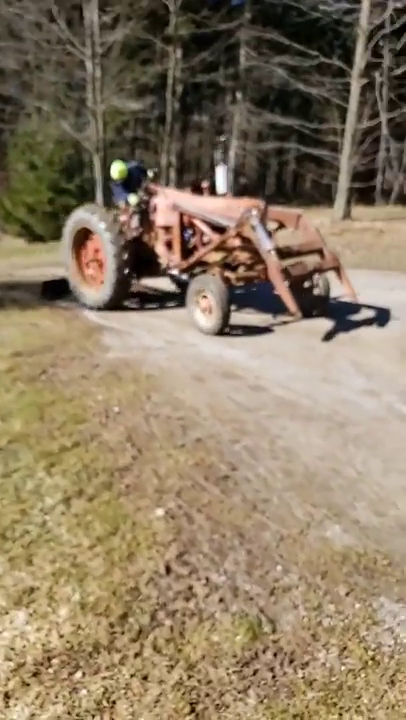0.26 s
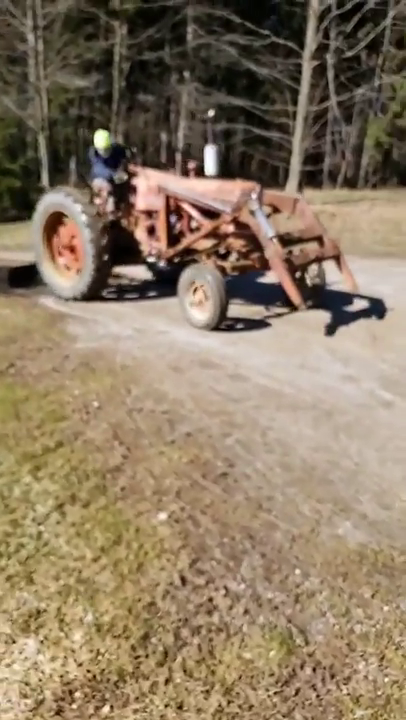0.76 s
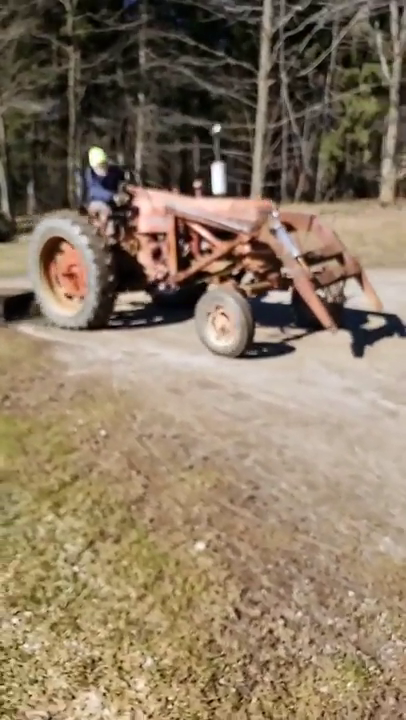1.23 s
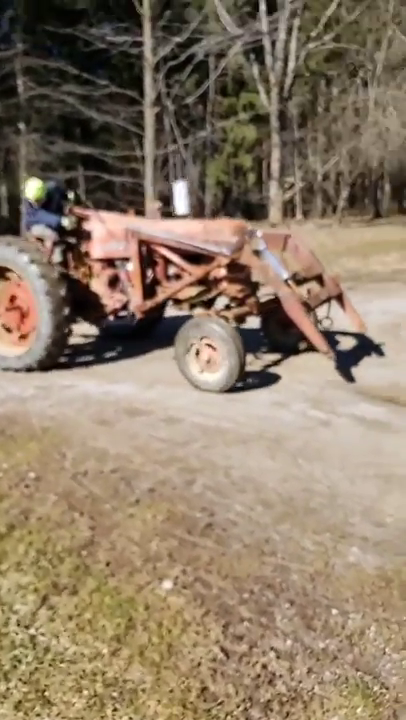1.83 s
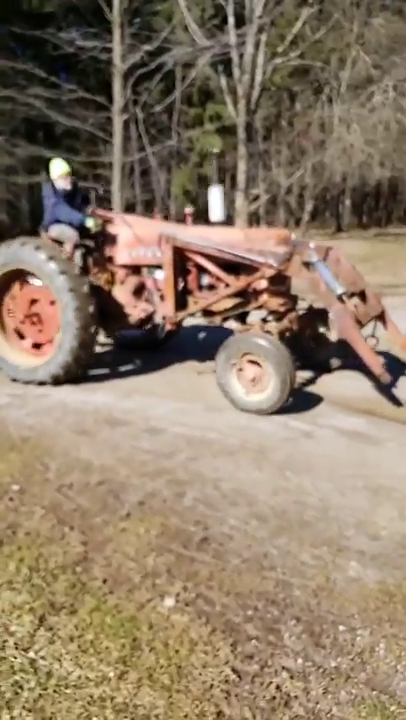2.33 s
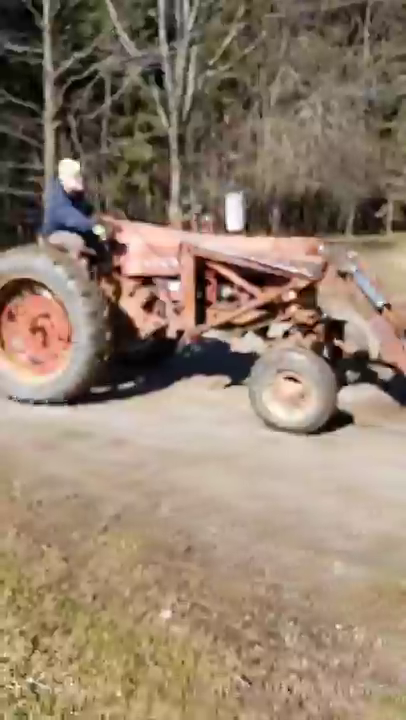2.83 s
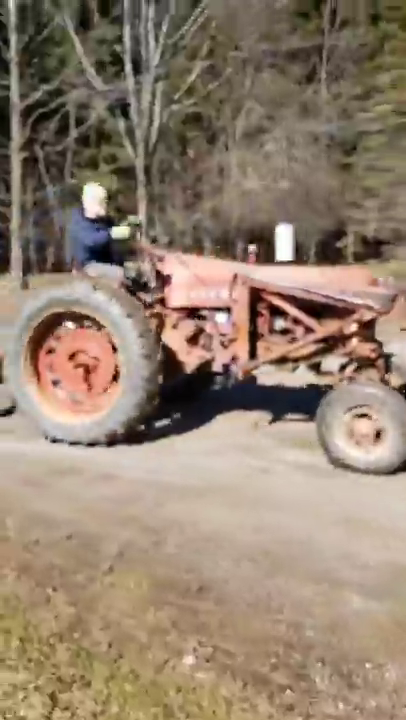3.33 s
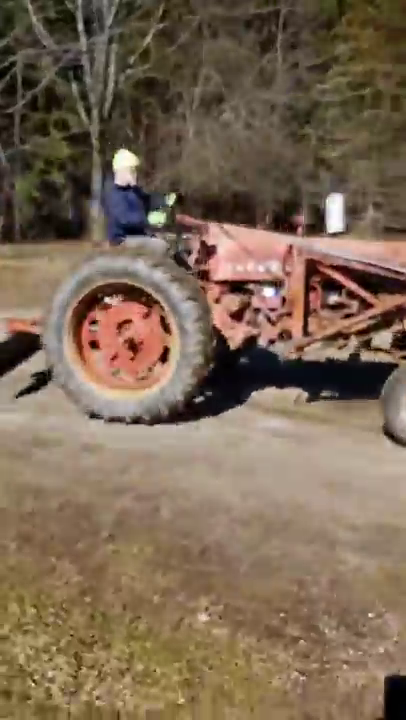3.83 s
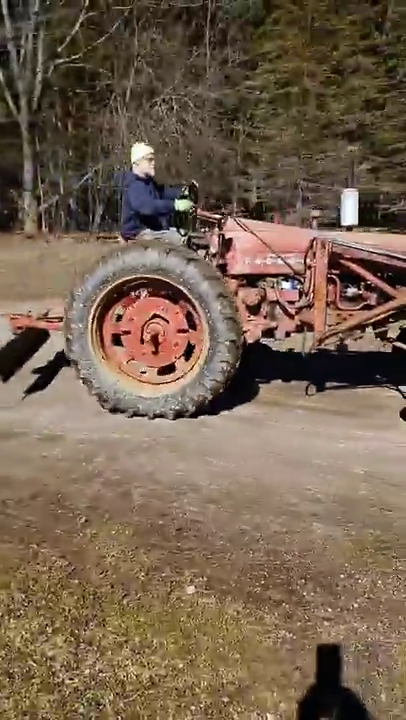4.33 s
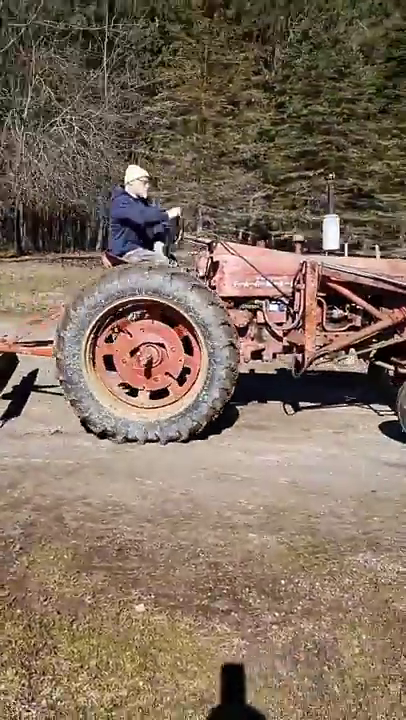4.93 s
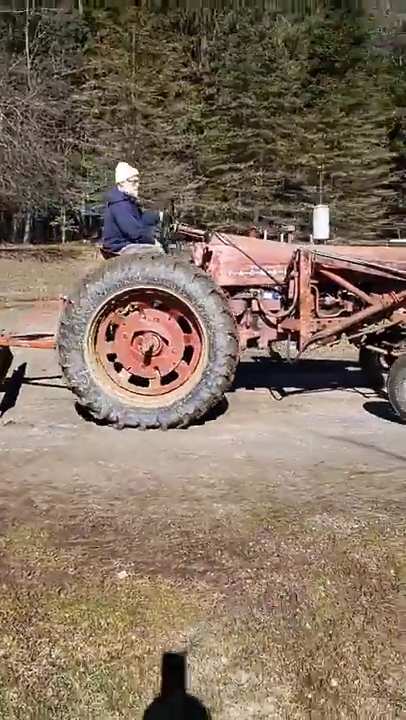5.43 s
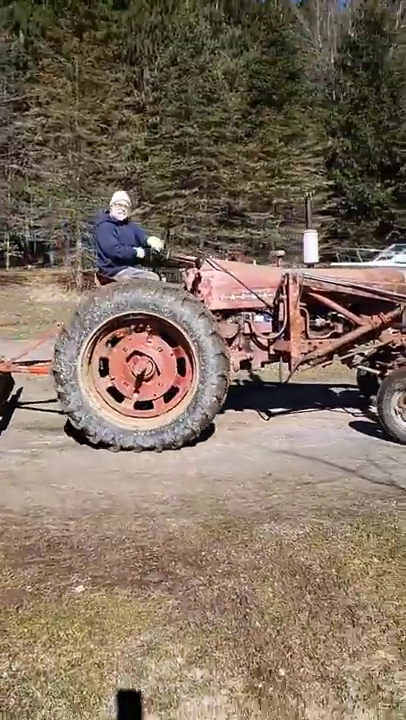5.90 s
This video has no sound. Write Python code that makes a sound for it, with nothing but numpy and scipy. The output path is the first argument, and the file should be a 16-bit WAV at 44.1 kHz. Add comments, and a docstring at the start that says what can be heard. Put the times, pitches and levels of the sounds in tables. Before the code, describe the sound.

A labouring four-cylinder engine approaches in the open air, with a deep fluttering drone, a fan hum, raspy hissing at each firing and loose metallic clatter. Scraping stones are strongest at first. The load lightens, a few small clinks stand out close by, and the revs sag to a lower, slower beat. Light wind thumps dot the sound before a loud gust rumbles over the ending.

```python
"""An old four-cylinder tractor drones close by, dragging a grader blade along a gravel drive, and throttles down.
A leak spits at every firing, the fan hums, the block and tappets clatter, and gravel hisses under the blade.
The exhaust is harmonics of the firing rate; the rest is mostly shaped noise, swelling with the firings.
Most parts follow the engine's speed, its effort and the distance from the microphone.
Light gusts nudge the microphone, then a hard one buffets it until the gain control ducks."""
import sys
import numpy as np
from scipy import signal
from scipy.fft import rfft, irfft
from scipy.io import wavfile
from scipy.ndimage import uniform_filter1d

SR = 44100
rng = np.random.default_rng(int(sys.argv[2]) if len(sys.argv) > 2 else 0)


def persist_wave(psi):
    """Save psi, clipped to +-1, as 16-bit WAV."""
    counts = np.round(np.clip(psi, -1, 1) * 32767).astype(np.int16)
    wavfile.write(sys.argv[1], SR, np.atleast_2d(counts).T)


N = 271656
T = np.arange(N) / SR

# Engine speed. Each row: time in seconds, firings a second.
FIRING_RATE = [(0.0, 42.976), (0.232, 40.148), (0.517, 39.234), (0.79, 40.114), (1.163, 37.485),
               (1.445, 43.111), (1.928, 45.606), (2.125, 44.099), (2.829, 44.863), (3.108, 43.212),
               (3.226, 44.543), (3.858, 47.137), (4.194, 44.97), (4.779, 35.223), (5.306, 31.656),
               (5.608, 33.912), (6.16, 33.757)]
# How hard the engine pulls: it labours, eases, is throttled down and picks up again.
# Each row: time in seconds, effort from 0 to 1.
ENGINE_EFFORT = [(0, 0.78), (.3, 0.94), (1.05, 1), (1.22, 0.99), (1.5, 1.0), (1.75, 0.7), (2.1, 0.5),
                 (2.8, 0.46), (3.15, 0.5), (3.7, 0.38), (4.0, 0.28), (4.4, 0.23), (4.85, 0.08),
                 (5.15, 0.18), (5.4, 0.44), (6.16, 0.34)]
# Colour of sliding gravel. Each row: frequency in Hz, relative level in dB.
GRAVEL_COLOUR = [(1500, -6), (3000, 10), (4200, 10.5), (5000, 1.5), (6000, 11), (7000, 3.5), (8400, 13.5),
                 (10300, 13.5), (13600, 10)]

# The drive past the microphone: moment of closest approach, ground speed, closest distance
PASS_S, GROUND_M_PER_S, CLOSEST_M = 4.74, 1.57, 5.54
CRUISE_RATE = 40  # firings a second


def gain_of(db):
    """Decibels to amplitude."""
    return 10 ** (np.asarray(db) / 20)


def evened(x):
    """Scales to rms 1."""
    return x / np.sqrt(np.mean(x ** 2) + 1e-20)


def curve(rows):
    """The second column of a time table, interpolated sample by sample."""
    s, values = np.transpose(rows)
    return np.interp(T, s, values)


def coloured(x, spectrum):
    """Passes x through a causal, minimum-phase filter with the given spectrum; rms 1."""
    size = 16384
    hz, db = np.transpose(spectrum)
    bin_hz = abs(np.fft.fftfreq(size, 1 / SR))
    log_gain = np.log(gain_of(np.interp(np.log(bin_hz + 1), np.log(hz), db)))
    response = np.exp(np.conj(signal.hilbert(log_gain)))
    impulse = np.fft.ifft(response).real[:size // 2]
    return evened(signal.oaconvolve(x, impulse)[:N])


def noise():
    """White noise."""
    return rng.standard_normal(N)


def waver(hz):
    """Chance fluctuation up to about the given rate; rms 1."""
    lowpass = 1 / (1 + (np.fft.rfftfreq(N, 1 / SR) / hz) ** 4)
    return evened(irfft(rfft(noise()) * lowpass, N))


def per_firing(firings):
    """One random number, held through each firing."""
    return rng.standard_normal(int(firings[-1]) + 2)[np.round(firings).astype(int)]


def extra_db(firings, rows):
    """Decibels added throughout the single firing nearest each listed time."""
    index = np.round(firings)
    return sum(db * (index == np.round(np.interp(s, T, firings))) for s, db in rows)


def stroke(firings, at, rise, fall):
    """A swell once a firing: peak place, rise and fall in parts of a firing."""
    u = (firings - at + .5) % 1 - .5
    return np.exp(-np.where(u < 0, (u / rise) ** 2, (abs(u) / fall) ** 1.43))


def knocks(firings, places, spread_db, fade):
    """Short rattles of uneven size at set places in every firing, decaying with time constant fade in seconds."""
    clicks = sum(np.diff(np.floor(firings - at), prepend=np.floor(firings[0] - at)) for at in places)
    sizes = gain_of(spread_db * np.clip(noise(), -2, 2))
    envelope = signal.lfilter([1], [1, -np.exp(-1 / (fade * SR))], clicks * sizes)
    return evened(envelope * noise())


def level(law):
    """A part's level in dB: it follows effort and engine speed, and falls with distance."""
    # dB at half effort, cruising and closest; dB more from no effort to full; dB more per octave of speed
    db, effort_db, octave_db = law
    effort, rate = curve(ENGINE_EFFORT), curve(FIRING_RATE)
    distance = np.hypot(CLOSEST_M, GROUND_M_PER_S * (T - PASS_S))
    from_engine = effort_db * (effort - .5) + octave_db * np.log2(rate / CRUISE_RATE)
    return db + from_engine + 20 * np.log10(CLOSEST_M / distance)


def exhaust(firings):
    """Harmonics of the firing rate, the second booming in the muffler, over a rumble of uneven combustion."""
    # Columns as level() lists them, each law a single row.
    drone_law = (-21.5, 13.1, 0)
    third_law = (-33, 7.5, -7.5)
    # Deepest note, at the firing rate. Each row: time in seconds, level in dB.
    deep_note = [(0, -37), (1.3, -32.5), (1.57, -23.5), (2.0, -36), (4.1, -34), (4.42, -23.5),
                 (4.75, -26.5), (5.05, -52), (6.16, -48)]
    # Weak lines from unequal cylinders. Each row: multiple of the firing rate, level in dB.
    side_orders = [(1.25, -47), (1.75, -45), (3.5, -47), (4, -42), (4.5, -49), (5, -47)]
    # Low rumble. Each row: frequency in Hz, relative level in dB.
    rumble_colour = [(25, -33), (45, 9.5), (70, 10.5), (110, 1.5), (160, 2.5), (230, 5), (290, -2),
                     (420, -14), (600, -34.5)]
    muffler_hz, muffler_width_hz = 72.4, 31.4  # the boom that the second harmonic slides through

    off_boom = (2 * curve(FIRING_RATE) - muffler_hz) / (muffler_width_hz / 2)
    second_db = level(drone_law) - 10 * np.log10(1 + off_boom ** 2)
    angle = 2 * np.pi * firings
    note = gain_of(curve(deep_note)) * np.cos(angle)
    note -= gain_of(second_db) * np.cos(2 * angle)
    note -= gain_of(level(third_law)) * np.cos(3 * angle)
    lope = sum(gain_of(db) * np.cos(k * angle + 2 * np.pi * rng.random()) for k, db in side_orders)
    rumble = coloured(noise() * (1 + 0.83 * np.cos(angle - 1.4)), rumble_colour)
    return np.sqrt(2) * (note * (1 + 0.14 * waver(24)) + lope) + gain_of(-34.0) * rumble


def leak(firings):
    """Each firing forces a jet through a gap and rings the pipe; the harder the jet, the brighter it hisses."""
    # Columns as level() lists them.
    leak_law = (-37.5, 34.7, 8.8)
    # Strength of each cylinder's jet in turn, in dB.
    cylinder_db = [-0.86, 0.2, -1.5, -1.03]
    # Extra hard firings. Each row: time in seconds, dB more.
    hard_firings = [(.683, 4.5), (.957, 3), (1.06, 3), (1.37, 2)]
    # The gap's low ring and its high hiss. Each row: frequency in Hz, relative level in dB.
    ring_colour = [(900, -61), (1300, -5.5), (2200, -30), (2600, -11), (3250, -4.5), (3480, 1.5),
                   (3620, -11), (3830, 3), (4250, -7.5), (4800, -8.5), (5300, -39), (8000, -55.5)]
    hiss_colour = [(3000, -37), (5000, -2), (5900, 1.5), (6550, 10.5), (6850, 13.5), (7100, 6), (7600, 3.5),
                   (8300, 6), (9200, 4), (10300, 6), (11200, 8.5), (11550, 5), (12200, 3.5), (13600, 4)]
    # Narrow ringing of pipe and manifold. Each row: frequency in Hz, width in Hz, relative level in dB.
    pipe_modes = [(2790, 90, -23), (2930, 80, -23), (3481, 20, -19), (3812, 50, -14), (4260, 80, -21),
                  (6570, 40, -19), (7105, 70, -17), (8152, 30, -24), (10180, 70, -24), (11530, 70, -19),
                  (11660, 90, -21), (13175, 90, -22)]

    firing = np.round(firings).astype(int)
    force_db = level(leak_law) + np.take(cylinder_db, firing, mode="wrap")
    force_db = force_db + 1.3 * per_firing(firings) + extra_db(firings, hard_firings)
    bright = gain_of(0.21 * (force_db + 22))
    sputter = gain_of(2.3 * waver(1200))
    puff = stroke(firings, at=-.05, rise=.12, fall=.14)
    spit = stroke(firings, at=0.0, rise=0.18, fall=0.052)
    ring = coloured(noise() * sputter, ring_colour) * (0.16 + puff)
    hiss = coloured(noise() * sputter, hiss_colour) * (.15 + spit)
    jet, pipe = noise() * puff, np.zeros(N)
    for hz, width, db in pipe_modes:
        mode = evened(signal.lfilter(*signal.iirpeak(hz, hz / width, fs=SR), jet))
        pipe += gain_of(db - 4) * mode * (bright if hz > 5000 else 1)
    return gain_of(force_db) * (gain_of(-5.0) * ring + gain_of(-1.0) * bright * hiss + pipe)


def machinery(firings):
    """Pistons knock in the block and the valve gear ticks, over a churning that swells at each firing."""
    # Columns as level() lists them, each law a single row.
    block_law = (-36.5, 6.9, 3.6)
    valve_law = (-39, -0.027, 8.6)
    # Block and valve gear. Each row: frequency in Hz, relative level in dB.
    block_colour = [(250, -18), (420, -8), (540, -0.5), (700, 1.5), (790, -2), (865, -0.5), (965, -10.5),
                    (1200, -12.5), (2000, -34.5)]
    valve_colour = [(700, -19.5), (1130, -4), (1330, 3), (1650, .5), (2100, 0.5), (2500, -4.5),
                    (2850, -4.5), (3300, -11.5), (3800, -7), (4800, -14), (7000, -25.5), (13000, -37)]

    pistons = knocks(firings, [-.28, .03], spread_db=6.5, fade=0.0032)
    ticks = knocks(firings, [-.08, .08, .55], spread_db=9, fade=0.0055)
    chug = evened(noise() * gain_of(1.04 * per_firing(firings)))
    whirr = evened(noise() * (1 + 0.24 * stroke(firings, at=0.062, rise=0.42, fall=0.66)))
    block = gain_of(level(block_law)) * coloured(.7 * pistons + chug, block_colour)
    valves = gain_of(level(valve_law)) * coloured(0.44 * ticks + whirr, valve_colour)
    return block + valves


def tappets(firings):
    """Under load the tappets clack, the loose one loudest; at low speed two cylinders also tick drily."""
    # Columns as level() lists them.
    tappet_law = (-29, 8.6, 10.6)
    # Strength of each cylinder's tappet in dB: the second is loose.
    tappet_cylinder_db = [-5, -2.5, -13, -8.5]
    # Extra hard blows. Each row: time in seconds, dB more.
    hard_taps = [(2.676, 5.5), (3.128, 7)]
    # Clack and dry tick. Each row: frequency in Hz, relative level in dB.
    clack_colour = [(1500, -20.5), (2500, -1.5), (2900, -8), (3300, -20), (3700, 5), (4150, 1.5),
                    (4600, -10), (5500, -28), (7500, -16), (8600, -10.5), (11500, -22), (13600, -20)]
    tick_colour = [(2500, -23), (4200, 1), (6000, -4), (8500, -2), (12000, 0), (13600, -1)]
    slack_effort, slack_db = .5, 52  # quieter below this effort, by so many dB per unit of effort
    tick_db = -36.5
    tick_below_rate, tick_span_rate = 34.6, 0.67  # firings a second: where ticks start, span of their fade-in

    slack = np.maximum(slack_effort - curve(ENGINE_EFFORT), 0)
    clack_db = level(tappet_law) - slack_db * slack
    clack_db = clack_db + 1.6 * per_firing(firings) + extra_db(firings, hard_taps)
    cylinder = np.round(firings).astype(int) % 4
    clack = coloured(noise(), clack_colour) * stroke(firings, at=-0.051, rise=0.04, fall=0.2)
    clack = clack * gain_of(tappet_cylinder_db)[cylinder]
    slow = np.clip((tick_below_rate - curve(FIRING_RATE)) / tick_span_rate, 0, 1)
    tick = coloured(noise(), tick_colour) * stroke(firings, at=-0.03, rise=0.033, fall=0.13)
    return gain_of(clack_db) * clack + gain_of(tick_db) * slow * tick * (cylinder < 2)


def fan(firings):
    """The belt-driven fan hums out of step with the firings and beats against them."""
    # Columns as level() lists them.
    fan_law = (-34.5, -5.5, 15.5)
    angle = 2 * np.pi * (2.555 * firings + 0.024 * waver(3.8))  # fan hum cycles per firing, with slight drift
    hum = np.cos(angle) + gain_of(-18.5) * np.cos(2 * angle) + gain_of(-23) * np.cos(3 * angle)
    return np.sqrt(2) * gain_of(level(fan_law)) * hum


def bounce(x):
    """Hood, loader arms and ground add faint early echoes that ripple the spectrum."""
    echoes = np.zeros(SR // 40)
    places = rng.integers(SR // 250, len(echoes), 14)  # 4 to 25 ms late
    echoes[places] = rng.choice([-1., 1.], 14) * np.exp(-places / SR / 0.0037)
    return x + gain_of(-15) * signal.oaconvolve(x, echoes / np.linalg.norm(echoes))[:N]


def gravel():
    """Countless small stones slide under the blade, a few of them snapping; louder where the blade bites."""
    # Columns as level() lists them.
    gravel_law = (-46, -0.69, 10.2)
    # The blade bites deeper. Each row: start in seconds, end in seconds, dB more.
    bites = [(0, 1.4, 12), (4.2, 4.33, 3.5)]
    ease_s = 0.35  # each bite eases in before its start and out after its end

    bite_db = 0
    for start, end, db in bites:
        inside_s = np.minimum(T - start, end - T)
        bite_db = bite_db + db * np.clip(1 + inside_s / ease_s, 0, 1)
    snap_size = gain_of(5 * np.minimum(rng.exponential(1, N), 4))
    snaps = noise() * (rng.random(N) < 900 / SR) * snap_size  # about 900 a second
    stones = coloured(noise() + 0.17 * evened(snaps), GRAVEL_COLOUR)
    return gain_of(level(gravel_law) + bite_db + 1.4 * waver(35)) * stones


def spill():
    """Coarse grit tumbles off the near end of the blade: lumpy noise in one swell as the tractor comes close."""
    # Each row: frequency in Hz, relative level in dB.
    grit_colour = [(800, -16), (1200, 4), (1600, 0), (2100, 4), (3000, -16), (4500, -6), (5400, -7),
                   (6200, -7), (7200, -25)]
    middle_s, half_s, spill_db = 4.26, 0.3, -42.5
    swell = np.exp(-.5 * ((T - middle_s) / half_s) ** 2)
    return gain_of(spill_db) * swell * coloured(noise() * gain_of(4 * waver(220)), grit_colour)


def clinks():
    """A stone or a loose link strikes iron: a dry crack and one ringing mode."""
    # Each row: time in seconds, level in dB, ring in Hz, decay by 60 dB in seconds, share of dry crack 0 to 1.
    strikes = [(3.517, -39, 5340, .3, .05), (3.864, -27, 11500, .012, .6),
               (5.247, -25.5, 4010, 0.037, 0.15)]
    crack_s = .0025  # time constant of the crack's decay
    out = np.zeros(N)
    for s, db, hz, t60, crack in strikes:
        t = np.maximum(T - s, 0)
        ring = np.sin(2 * np.pi * hz * t) * gain_of(-60 * t / t60)
        snap = coloured(noise(), GRAVEL_COLOUR) * np.exp(-t / crack_s) * (t > 0)
        out += gain_of(db) * ((1 - crack) * ring + crack * snap)
    return out


def wind():
    """Eddies slap the microphone port; the hard gust is lumpier and reaches higher."""
    # Light gusts. Each row: middle in seconds, half length in seconds, level in dB,
    # level of the finer eddies against the large ones in dB.
    gusts = [(0.12, 0.18, -30, -0.5), (0.366, 0.09, -30, 1), (0.554, 0.069, -41.5, 3.5),
             (.72, 0.2, -38.5, 4), (1.144, 0.093, -27.5, -14.5), (1.234, 0.017, -30, -30),
             (1.632, .04, -28.5, -7.5), (2.536, 0.018, -26, -23), (2.58, 0.034, -26.5, -5),
             (4.65, 0.027, -26.5, -12), (4.797, .027, -23.5, -14), (4.876, 0.018, -23, -13),
             (5.203, 0.054, -28.5, -15)]
    # Large eddies, finer eddies and the hard gust. Each row: frequency in Hz, relative level in dB.
    large_colour = [(22, -17), (45, -0.5), (110, 3.5), (170, -0.5), (260, -7.5), (400, -12), (700, -43),
                    (1500, -37), (3000, -50)]
    fine_colour = [(60, -13), (150, -7), (230, 9), (300, 0), (420, -12), (600, -3), (880, -6.5),
                   (1080, -18.5), (1400, -13), (3000, -80)]
    hard_colour = [(20, -26), (45, 2), (65, 3), (130, -2), (230, -4), (400, -8), (600, -11.5), (900, -18),
                   (1300, -23), (1900, -34), (2800, -47), (5000, -92)]
    # The long hard gust. Each row: time in seconds, level in dB.
    hard_gust = [(5.5, -37), (5.53, -13.5), (5.64, -10), (5.73, -5), (5.88, -9.5), (5.93, -7), (6.0, -10.5),
                 (6.06, -4.5), (6.16, -12.5)]

    large = coloured(noise() * gain_of(2.0 * waver(59)), large_colour)
    fine = coloured(noise() * gain_of(2.0 * waver(76)), fine_colour)
    light = np.zeros(N)
    for s, half, db, fine_db in gusts:
        swell = np.exp(-.5 * ((T - s) / half) ** 2)
        light += gain_of(db) * swell * (large + gain_of(fine_db) * fine)
    onset = np.clip((T - 5.45) / 0.056, 0, 1)
    hard = coloured(noise() * gain_of(3.1 * waver(310)), hard_colour)
    return light + gain_of(curve(hard_gust)) * onset * hard


def ducked(x):
    """Gain control: turns everything down gradually while the sound is over a threshold."""
    above_db, share, reaction_s = -17.5, 0.83, 0.073  # threshold, share of the excess taken off, time constant
    power_db = 10 * np.log10(abs(uniform_filter1d(x[0] ** 2, size=SR // 20)) + 1e-12)
    keep = np.exp(-1 / (reaction_s * SR))
    over_db = signal.lfilter([1 - keep], [1, -keep], np.maximum(power_db - above_db, 0))
    return x * gain_of(-share * over_db)


def scene():
    """A running count of firings paces the engine sounds; stones and wind have their own timing."""
    firings = .526 + np.cumsum(curve(FIRING_RATE)) / SR + .005 * waver(12)  # slightly unsteady
    clatter = bounce(leak(firings) + machinery(firings) + tappets(firings))
    tractor = exhaust(firings) + clatter + fan(firings)
    return (tractor + gravel() + spill() + clinks() + wind())[None]


def record(dry):
    """The microphone port dulls one treble band, gain control ducks, peaks are rounded off, the top is cut."""
    dip_hz, dip_width_hz, dip_depth = 6830, 1830, 0.42  # depth from 0 to 1
    ceiling, edge_hz = .68, 14000
    port = signal.lfilter(*signal.iirpeak(dip_hz, dip_hz / dip_width_hz, fs=SR), dry)
    heard = ducked(dry - dip_depth * port)
    limited = heard / (1 + (heard / ceiling) ** 6) ** (1 / 6)
    lowpass = signal.firwin(301, edge_hz, window=("kaiser", 9), fs=SR)
    return signal.oaconvolve(limited, lowpass[None], "same")


dry = scene()
out = record(dry)
persist_wave(out)
```